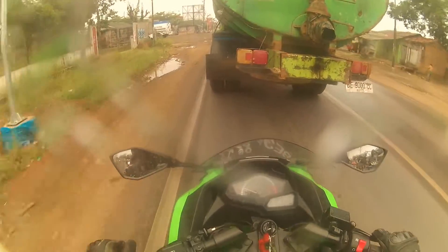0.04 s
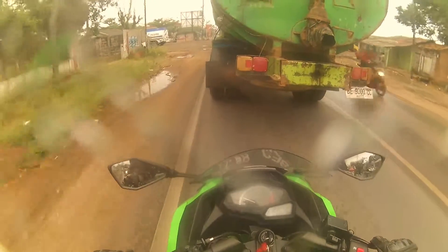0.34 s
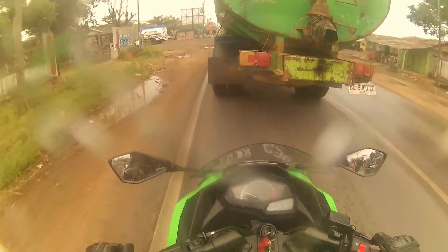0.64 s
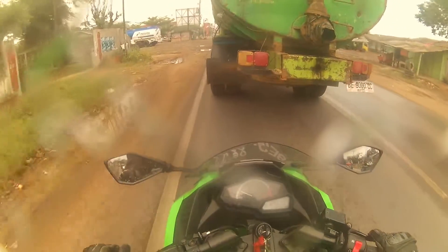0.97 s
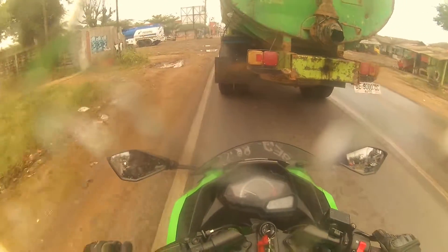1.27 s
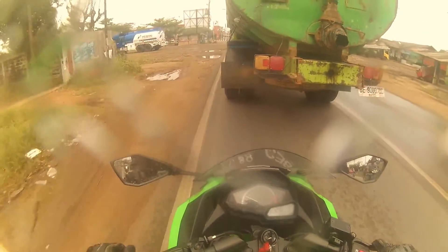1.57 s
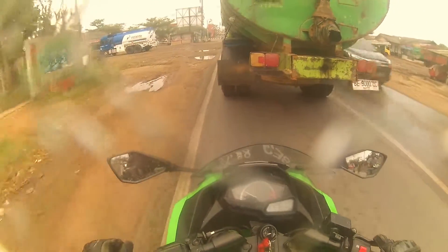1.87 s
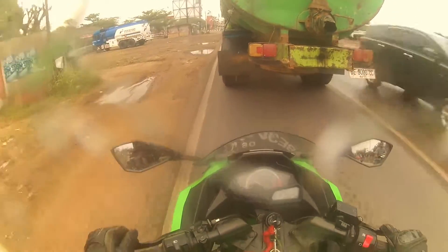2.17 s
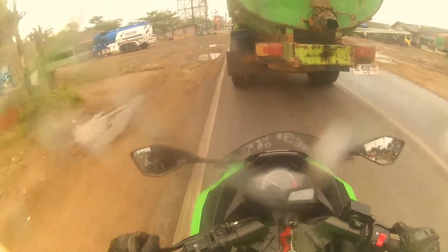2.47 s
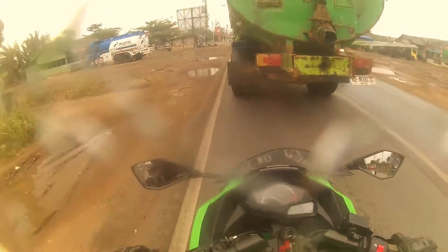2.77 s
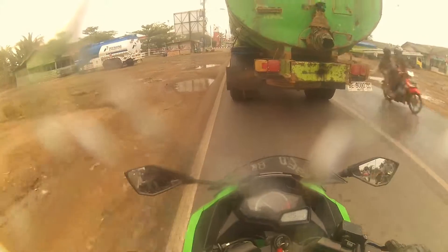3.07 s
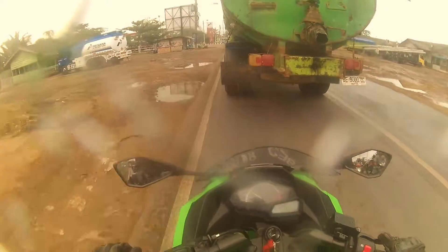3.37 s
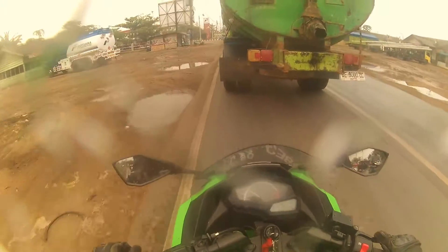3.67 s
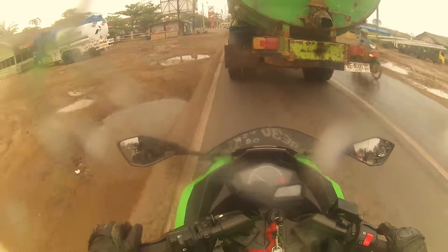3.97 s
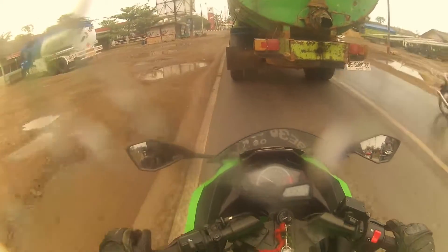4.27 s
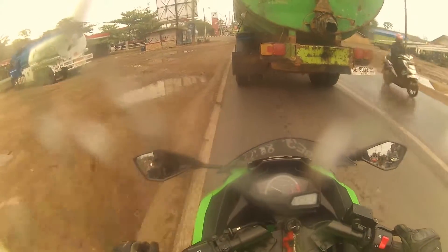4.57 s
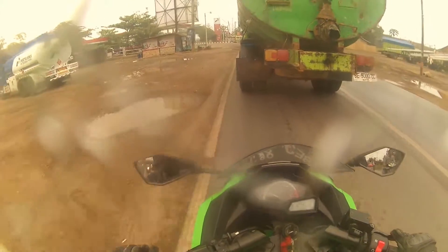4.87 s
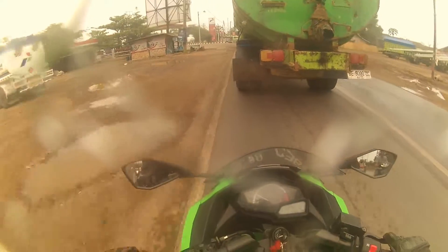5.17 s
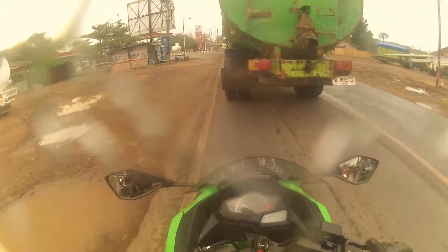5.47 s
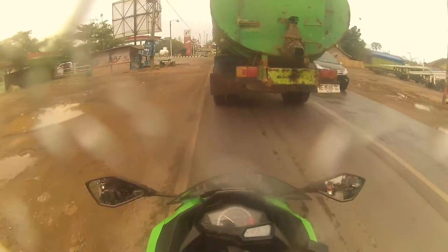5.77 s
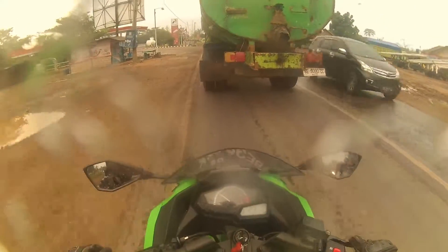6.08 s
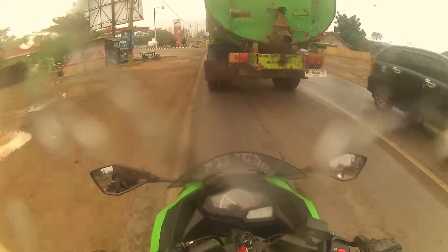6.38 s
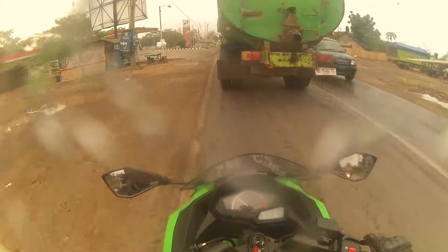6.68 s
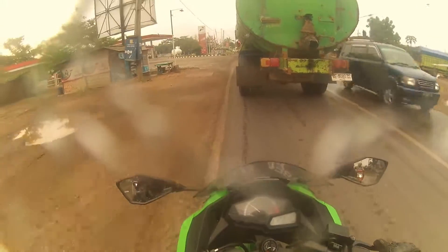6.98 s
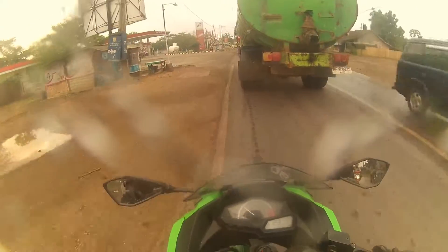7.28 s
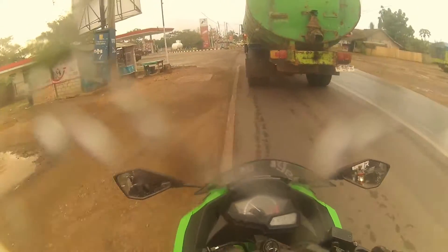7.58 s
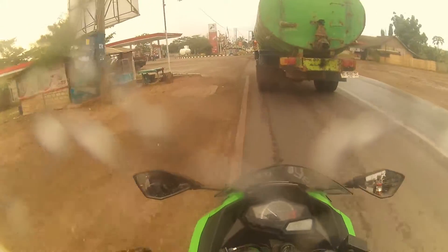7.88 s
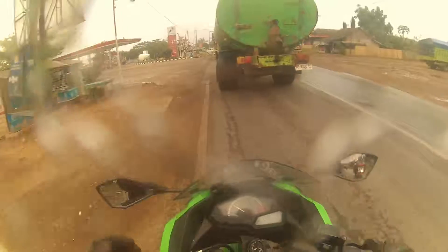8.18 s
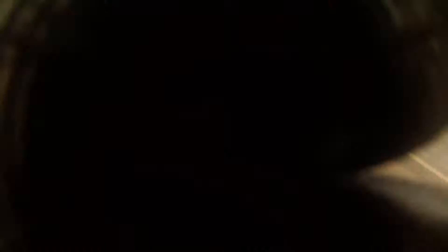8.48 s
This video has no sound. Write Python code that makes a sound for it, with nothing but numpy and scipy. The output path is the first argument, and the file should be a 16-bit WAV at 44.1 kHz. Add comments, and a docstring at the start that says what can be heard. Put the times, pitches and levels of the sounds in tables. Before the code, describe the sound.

A motorcycle rolls slowly behind a tanker on a wet road, heard from inside a camera's plastic case. Both engines drone low, gently rising and easing over road rumble. Oncoming tyres swish past with small splashes, thin squeals and a faint scooter. At the end a glove rubs over the case, with a much louder thump and a few sharp knocks.

```python
"""On a wet road, a motorcycle rolls slowly behind a tanker, heard from inside a camera's plastic case.
Two engines drone over the road's rumble, with splashes, thin squeals and a passing scooter.
The hiss of wet tyres, near and oncoming, makes the waterproof case ring at its own pitches.
At the end a glove rubs over the case, thumps it shut and knocks it a few times."""
import sys
import numpy as np
from scipy import signal
from scipy.fft import rfft, irfft, next_fast_len
from scipy.io import wavfile
from scipy.ndimage import uniform_filter1d

SR = 44100
rng = np.random.default_rng(int(sys.argv[2]) if len(sys.argv) > 2 else 0)


def to_wav(s):
    """Save 16-bit WAV."""
    ch = np.atleast_2d(s).T  # columns
    pcm = np.round(np.clip(ch, -1, 1) * 32767)  # PCM
    wavfile.write(sys.argv[1], SR, pcm.astype(np.int16))


N = 385434
T = np.arange(N) / SR


def from_db(db):
    return 10 ** (np.asarray(db) / 20)


def unit_level(x):
    """Scales a sound to an average (rms) level of 1."""
    return x / np.sqrt(np.mean(x ** 2) + 1e-20)


def in_time(rows):
    """Joins timed points with straight lines, one curve for each column after the time."""
    times, *columns = np.transpose(rows)
    return [np.interp(T, times, column) for column in columns]


def band(x, hz, kind, order=2):
    """Keeps the pitches below a limit ("low") or between two ("band")."""
    sections = signal.butter(order, np.clip(hz, 10, .45 * SR), kind, fs=SR, output="sos")
    return signal.sosfilt(sections, x + 1e-18)


def drift(rate_hz):
    """A smooth random wobble, about 1 in size; a higher rate wobbles faster."""
    r = np.exp(-80 * np.pi * rate_hz / SR)
    slow = signal.lfilter([1], [1, -2 * r, r * r], rng.standard_normal(N // 40 + 2002))[2000:]
    return np.interp(np.arange(N) / 40, np.arange(len(slow)), unit_level(slow))


def coloured(x, spectrum):
    """Makes some pitch ranges stronger than others; comes out at level 1."""
    size = next_fast_len(N)
    hz, db = np.transpose(spectrum)
    bin_hz = np.maximum(np.fft.rfftfreq(size, 1 / SR), 1)
    gain = from_db(np.interp(np.log(bin_hz), np.log(hz), db))
    return unit_level(irfft(rfft(x, size) * gain, size)[:N])


def grains(per_s, spread_db):
    """Tiny random impacts of uneven size, at level 1."""
    sizes = from_db(spread_db * np.minimum(rng.exponential(1, N), 4)) * rng.choice([-1, 1], N)
    return unit_level(sizes * (rng.random(N) < per_s / SR))


def add(out, start_s, sound):
    at = min(int(start_s * SR), N)
    out[at:at + len(sound)] += sound[:N - at]


def swell(nearest_s, half_s):
    """The power of something that draws near and falls behind again."""
    return 1 / (1 + ((T - nearest_s) / half_s) ** 2) ** 2


def tone(curve, rough):
    """One gliding tone whose loudness wavers."""
    hz, db = in_time(curve)
    return np.sqrt(2) * from_db(db) * (1 + rough * drift(4.6)) * np.sin(2 * np.pi * np.cumsum(hz) / SR)


def engine(speed, booms, rough, wander):
    """An exhaust drones, louder when pulling or when its pipe booms. Also gives the firing phase."""
    # The exhaust's tones. Each row: multiple of the firing rate, relative level in dB.
    exhaust = [(.5, -14), (1, 0.5), (1.5, -13), (2, -16), (3, -13.5), (4, -19.5)]
    load_db, full_load_hz_per_s = 1, 18  # the boost at full throttle; the speed-up that counts as full
    hz, = in_time(speed)
    power = sum(from_db(db) ** 2 / (1 + (2 * (hz - boom_hz) / width) ** 2)
                for boom_hz, width, db in booms)
    throttle = np.clip(np.gradient(hz) * SR / full_load_hz_per_s, -1, 1)
    load = uniform_filter1d(throttle, size=SR // 5)
    firing = 2 * np.pi * np.cumsum(hz * (1 + wander * drift(9.2))) / SR
    drone = 0
    for multiple, db in exhaust:
        strength = from_db(db) * (1 + rough * drift(25))
        drone += strength * np.sin(multiple * firing + rng.uniform(0, 2 * np.pi))
    return np.sqrt(power) * from_db(load_db * load) * unit_level(drone), firing


def motorcycle():
    """The motorcycle's engine speeds up and eases off. Also gives the firing phase."""
    # Engine speed. Each row: time in seconds, firings per second.
    speed = [(0, 72), (.55, 75), (1, 80), (1.4, 87), (1.85, 101), (2.2, 95.5), (3.3, 100), (3.85, 88),
             (4.1, 79), (4.45, 75.3), (5.05, 94), (5.6, 111), (6.4, 115.5), (6.85, 106.5), (7.25, 104.5),
             (8.25, 91)]
    # Where the exhaust pipe booms. Each row: firing rate in Hz, width in Hz, level in dB.
    booms = [(94.7, 32, -57)]
    return engine(speed, booms, rough=0.14, wander=0.004)


def tanker():
    """The tanker's rougher engine booms as its firing rate meets a pitch of its pipe."""
    # Engine speed. Each row: time in seconds, firings per second.
    speed = [(0, 66.9), (1.1, 64), (1.5, 71.9), (1.8, 83.6), (2.25, 118), (2.8, 120.9), (3.5, 112),
             (4.2, 72.1), (4.8, 69.7), (5.25, 86.2), (5.5, 98), (6.9, 82.4), (7.3, 77.9), (8.2, 77)]
    # Where the exhaust pipe booms. Each row: firing rate in Hz, width in Hz, level in dB.
    booms = [(80, 11.4, -58.5), (119, 2.2, -57)]
    drone, _ = engine(speed, booms, rough=0.23, wander=0.00657)
    return drone


def drivetrain():
    """The parts that turn the wheels hum faintly."""
    # The hum. Each row: time in seconds, pitch in Hz, level in dB.
    hum = [(0, 227.7, -78), (1.2, 228, -65.5), (2.9, 220.9, -65.5), (4.1, 226, -67), (5.4, 216.2, -69.5),
           (8.2, 210.3, -80)]
    return tone(hum, rough=0.16)


def through_case(x):
    """The plastic case boosts the pitches it rings at; comes out at level 1."""
    # Where the case rings. Each row: pitch in Hz, width in Hz, boost in dB.
    resonances = [(1194, 39, 11), (1360, 22, 6.5), (1786, 83, 10.5), (2151, 54, 9.5), (2785, 44, 6),
                  (3020, 49, 6.5), (3126, 50, 6), (3940, 115, 4.5), (4440, 120, 2), (5460, 89, 4)]
    out = x
    for hz, width, boost_db in resonances:
        r = np.exp(-np.pi * width / SR)
        feedback = [1, -2 * r * np.cos(2 * np.pi * hz / SR), r * r]
        ring = signal.lfilter(np.array([1, 0, -1]) * (1 - r * r) / 2, feedback, x)
        out = out + (from_db(boost_db) - 1) * ring
    return unit_level(out)


def oncoming():
    """The power of tyre swish and of spray rises and falls as each oncoming vehicle goes by."""
    # Each row: time when nearest and half the swell's width in seconds, swish and spray levels in dB.
    vehicles = [(.25, 0.38, -63, -77), (.68, 0.054, -59, -66), (2.15, 0.41, -55.5, -59),
                (2.85, 0.27, -56, -64), (3.2, 0.43, -56, -60.5), (4.0, .3, -70, -65.5),
                (4.851, 0.17, -62, -63), (5.75, 0.46, -58, -61), (6.35, 0.65, -56.5, -60),
                (7.2, 0.42, -56.5, -62.5), (7.95, 0.15, -58, -66)]
    swish = sum(from_db(db) ** 2 * swell(s, half_s) for s, half_s, db, _ in vehicles)
    spray = sum(from_db(db) ** 2 * swell(s, half_s) for s, half_s, _, db in vehicles)
    return swish, spray


def passing_tyres(swish_power):
    """Wet tyres swish as each vehicle comes out from behind the tanker, then fade."""
    # The colour of the swish. Each row: pitch in Hz, relative level in dB.
    swish_colour = [(700, -31), (1300, -9), (1700, -9), (2150, 9), (2450, 2), (2700, -6.5), (3300, -7),
                    (4400, -19), (5000, -26), (7500, -18), (10000, -36)]
    return np.sqrt(swish_power) * through_case(coloured(rng.standard_normal(N), swish_colour))


def road(firing, swish_power, spray_power, throb, flutter_db):
    """Wet asphalt rumbles; hiss and spray throb with the engine and grow as traffic passes."""
    # The colours of road rumble, tyre hiss and fine spray. Each row: pitch in Hz, relative level in dB.
    rumble_colour = [(15, -3), (30, -1.5), (60, 2), (100, 1), (125, 3.5), (155, 0), (215, -0.5), (255, -5),
                     (305, -2), (430, -10.5), (600, -10.5), (800, -22.5), (1500, -20), (4000, -66)]
    hiss_colour = [(300, -18), (600, -20), (780, -10.5), (1000, -6.5), (1280, -5.5), (1480, -13),
                   (1950, -7.5), (2380, -5), (2650, -18), (3200, -52), (6000, -63)]
    spray_colour = [(1500, -37), (2600, -6.5), (2900, 0), (3450, 0), (3720, -7), (4000, -2.5), (4450, -1.5),
                    (4950, -14), (6200, -12), (7500, -10), (9000, -20.5), (12000, -21), (16000, -34)]
    rumble_db, hiss_db, spray_db = -55, -55.5, -62  # the steady ride, without traffic
    hiss_share_db = -1.5  # hiss that a passing vehicle adds, compared with its swish
    beat = 1 + throb * np.cos(firing)
    flutter = from_db(flutter_db * drift(30))
    rumble = from_db(rumble_db + 0.53 * drift(4.3)) * coloured(rng.standard_normal(N), rumble_colour)
    hiss_gain = np.sqrt(from_db(hiss_db) ** 2 + from_db(hiss_share_db) ** 2 * swish_power)
    spray_gain = np.sqrt(from_db(spray_db) ** 2 + spray_power)
    hiss = hiss_gain * through_case(coloured(beat * rng.standard_normal(N), hiss_colour))
    drops = grains(per_s=16000, spread_db=1.5)
    spray = spray_gain * through_case(coloured(beat * drops, spray_colour))
    return rumble + flutter * (hiss + spray)


def electronics(hiss_db):
    """The camera's electronics hiss and give off a thin whine."""
    # The tones of the whine. Each row: pitch in Hz, level in dB.
    whine_tones = [(13248, -91), (13331, -82), (13414, -82), (13497, -93), (14050, -94), (14103, -86)]
    whine = sum(np.sqrt(2) * from_db(db) * np.sin(2 * np.pi * hz * T + rng.uniform(0, 2 * np.pi))
                for hz, db in whine_tones)
    return whine + from_db(hiss_db) * rng.standard_normal(N)


def bumps(half_s, range_hz):
    """The deepest rumble swells over rough patches of road."""
    # Rough patches. Each row: time in seconds, level in dB.
    patches = [(.3, -60), (3.0, -56), (4.42, -59), (6.25, -62), (7.15, -57)]
    power = sum(from_db(db) ** 2 * swell(s, half_s) for s, db in patches)
    return np.sqrt(power) * unit_level(band(rng.standard_normal(N), range_hz, "band"))


def splashes():
    """The wheels throw up brief showers of droplets and grit."""
    # Each row: start in seconds, length in seconds, pitch in Hz, level in dB.
    showers = [(.38, 0.11, 3600, -61), (.28, 0.31, 5500, -70), (.66, .06, 4000, -63),
               (1.41, 0.042, 3800, -62), (2.675, 0.046, 4260, -63), (2.94, 0.076, 4100, -59),
               (4.222, 0.066, 3250, -57), (4.383, 0.027, 6900, -60.5), (4.597, .2, 5500, -73),
               (4.85, .12, 7004, -68)]
    out, drops = np.zeros(N), grains(per_s=15000, spread_db=4.5)
    for start, length, hz, db in showers:
        n, at = int(length * SR), int(start * SR)
        patter = band(drops[at:at + n], [hz * 0.79, hz * 1.16], "band", order=3)
        add(out, start, from_db(db) * np.hanning(n) * unit_level(patter))
    return out


def squeals(waver):
    """Thin squeals from the traffic glide in pitch and flicker as they swell and fade; the short ones near 2.2
    kHz are pings of the case itself."""
    # Each row: start and length in seconds, first and last pitch in Hz, level in dB.
    glides = [(0.633, 0.12, 2080, 2010, -63), (1.623, 0.14, 890, 920, -66), (1.772, 0.14, 950, 1073, -61),
              (1.87, 0.059, 2200, 2210, -54), (2.718, 0.28, 1140, 1098, -61),
              (2.81, 0.073, 2150, 2170, -50.5), (3.482, 0.21, 930, 875, -66.5),
              (5.32, 0.07, 2195, 2220, -53), (5.698, .14, 1400, 1230, -58), (5.975, 0.24, 1338, 1233, -60),
              (6.181, .36, 1325, 1273, -57.5), (6.478, 0.29, 1295, 1330, -59.5),
              (8.63, 0.029, 2120, 2190, -51)]
    out, unsteady = np.zeros(N), 1 + waver * drift(50)
    for start, length, first_hz, last_hz, db in glides:
        n, at = int(length * SR), int(start * SR)
        hz = np.linspace(first_hz, last_hz, n) * unsteady[at:at + n]
        loudness = from_db(db) * np.sqrt(2 * np.hanning(n))
        add(out, start, loudness * np.sin(2 * np.pi * np.cumsum(hz) / SR))
    return out * from_db(2.5 * drift(35))


def scooter():
    """An oncoming scooter falls in pitch as it passes."""
    # The scooter's note. Each row: time in seconds, pitch in Hz, level in dB.
    note = [(2.8, 398.3, -95), (3.1, 394, -80), (3.3, 385.6, -65.5), (3.6, 378, -68), (3.9, 358.2, -72),
            (4.3, 345.4, -100)]
    return tone(note, rough=0.15)


def glove(split_hz, slip_db):
    """Fabric catches and slips on the case; each stroke builds, holds and dies away."""
    # The colour of the rubbing. Each row: pitch in Hz, relative level in dB.
    rub_colour = [(20, 6), (80, 18.5), (200, 6), (320, 5.5), (430, 9), (600, -2), (850, -4), (1300, -2),
                  (2000, -2.5), (2700, -6.5), (3400, -10), (4300, -8.5), (5600, -12.5), (7000, -14.5),
                  (9000, -25), (11000, -21.5), (16000, -26)]
    # Strokes. Each row: start and length in seconds, level in dB, dB added to the bright, scratchy part.
    strokes = [(8.275, 0.066, -44, 6), (8.324, 0.042, -36.5, -7), (8.379, 0.048, -46, 3.5),
               (8.446, 0.037, -36, -8.5), (8.484, 0.05, -43, -20), (8.538, 0.049, -39, -3),
               (8.59, 0.088, -46.5, -13), (8.663, 0.073, -39, -6), (8.722, .04, -32.5, -11)]
    rise_share, fade_s = 0.36, 0.015  # a stroke builds over this share of its length
    slips = grains(per_s=7000, spread_db=0.5) * from_db(slip_db * drift(70))
    rub = through_case(coloured(slips, rub_colour))
    dull = band(rub, split_hz, "low", order=1)
    dull_power, bright_power = 0, 0
    for start, length, db, scratch_db in strokes:
        rise = np.clip((T - start) / (rise_share * length), 0, 1)
        fade = np.exp(-np.maximum(T - start - length, 0) / fade_s)
        dull_power += (from_db(db) * rise * fade) ** 2
        bright_power += (from_db(db + scratch_db) * rise * fade) ** 2
    return np.sqrt(dull_power) * dull + np.sqrt(bright_power) * (rub - dull)


def struck(tones):
    """A blow sets off fading tones, each with a slightly random strength."""
    t = T[:SR // 5]
    return sum((-1) ** k * from_db(db + rng.normal(0, 1) - 60 * t / ring_s) * np.sin(2 * np.pi * hz * t)
               for k, (hz, db, ring_s) in enumerate(tones))


def knocks(thud_s, soft_hz):
    """Soft finger blows thud and set the shell of the case ringing; the palm's press and release ring it too."""
    # Blows, with the palm's press and release at 8.4438 and 8.4493 s. Each row: start in seconds, thud pitch in
    # Hz, thud level in dB, ring level in dB.
    blows = [(8.2854, 476, -29.5, -43), (8.3338, 330, -20.5, -22), (8.358, 308, -28, -48),
             (8.366, 159, -23, -53), (8.4438, 330, -34, -15.5), (8.4493, 330, -36, -20),
             (8.488, 273, -26, -29), (8.621, 458, -25.5, -53), (8.689, 265, -16.5, -26),
             (8.7196, 400, -17, -26.5), (8.7221, 400, -20, -38)]
    # The shell's ring. Each row: pitch in Hz, relative level in dB, seconds to fade by 60 dB.
    shell = [(760, -9.5, 0.018), (1006, -11.5, 0.04), (1226, -3, 0.025), (1440, -9, 0.014),
             (1640, -15, 0.022), (2140, -32, .04), (3470, -19, 0.021)]
    out = np.zeros(N)
    for start, thud_hz, thud_db, ring_db in blows:
        thud = struck([(thud_hz, thud_db, thud_s)])
        add(out, start, thud + from_db(ring_db) * struck(shell))
    return band(out, soft_hz, "low")


def palm(leak_hz, damping, soft_hz):
    """The palm squeezes the trapped air and lets go; the pressure leaks away with a low thump."""
    # Presses. Each row: start in seconds, seconds held, strength of the push.
    presses = [(8.444, 0.0039, 0.49), (8.68, 0.0106, 0.066)]
    rebound, lift_s = 1.1, 0.003  # the lifting palm sucks a little more than it pressed
    pressure = sum(push * ((T >= start) - rebound * np.clip((T - start - hold) / lift_s, 0, 1))
                   for start, hold, push in presses)
    w = 2 * np.pi * leak_hz
    swing = signal.lfilter(*signal.bilinear([1, 0, 0], [1, 2 * damping * w, w * w], SR), pressure)
    return band(swing, soft_hz, "low", order=3)


def clicks():
    """Hard plastic clicks with a short, bright ring."""
    # Clicks. Each row: start in seconds, level in dB.
    hits = [(8.446, -44.5), (8.462, -49), (8.6646, -31.5)]
    # The plastic's ring. Each row: pitch in Hz, relative level in dB, seconds to fade by 60 dB.
    plastic = [(1270, -4, 0.012), (1520, 4, 0.045), (1870, -4.5, 0.092), (2230, 0.5, 0.033),
               (2950, -5.5, 0.055), (3440, 3.5, 0.0073), (5450, -1.5, 0.011), (6430, -4.5, 0.011),
               (8300, 0, 0.003), (11100, -9.5, 0.0062), (13700, -17, 0.0057)]
    out = np.zeros(N)
    for start, db in hits:
        add(out, start, from_db(db) * struck(plastic))
    return out


def scene():
    """Engines, traffic and the wet road, then the hand on the case."""
    bike, firing = motorcycle()
    swish_power, spray_power = oncoming()
    traffic = tanker() + passing_tyres(swish_power) + drivetrain() + scooter() + squeals(waver=0.0093)
    ride = road(firing, swish_power, spray_power, throb=0.086, flutter_db=0.9)
    ride += bumps(half_s=0.14, range_hz=[18, 60]) + splashes()
    hand = glove(split_hz=1030, slip_db=1) + knocks(thud_s=0.012, soft_hz=2220)
    hand += palm(leak_hz=43.3, damping=0.32, soft_hz=292) + clicks()
    return (bike + traffic + ride + hand + electronics(hiss_db=-68.5))[None]


def record(dry):
    """The very highest treble is cut off steeply."""
    cutoff_hz = 15800
    return signal.sosfilt(signal.ellip(12, .1, 80, cutoff_hz, fs=SR, output="sos"), dry)


dry = scene()
out = record(dry)
to_wav(out)
```